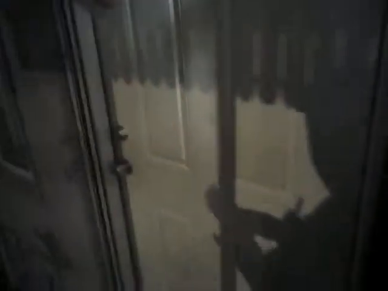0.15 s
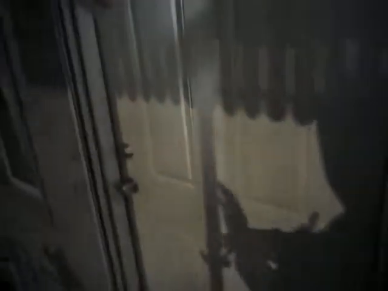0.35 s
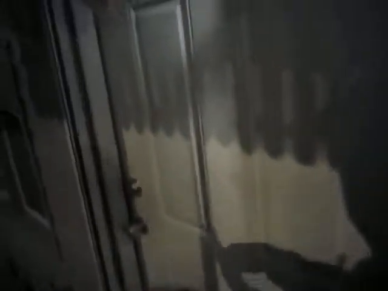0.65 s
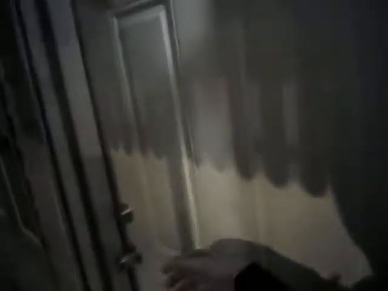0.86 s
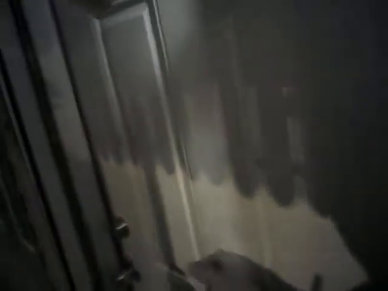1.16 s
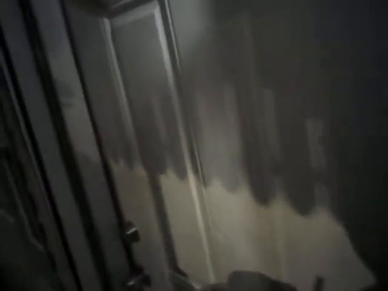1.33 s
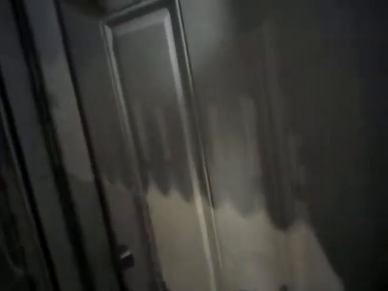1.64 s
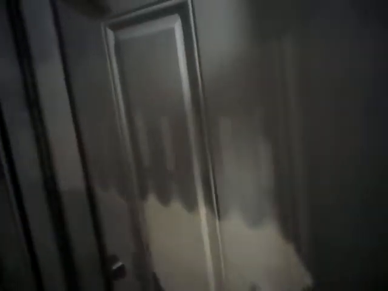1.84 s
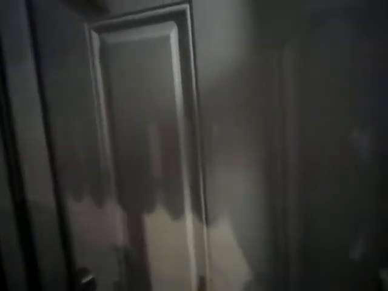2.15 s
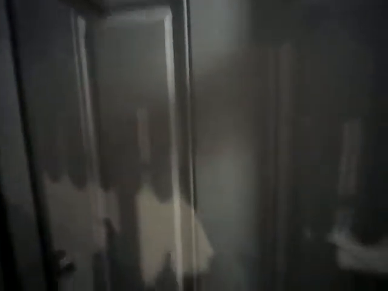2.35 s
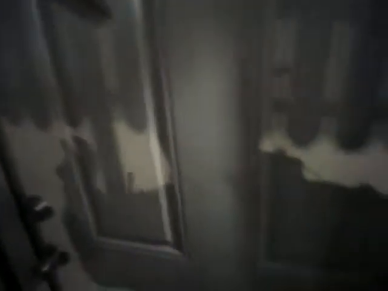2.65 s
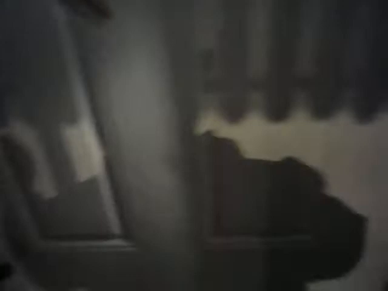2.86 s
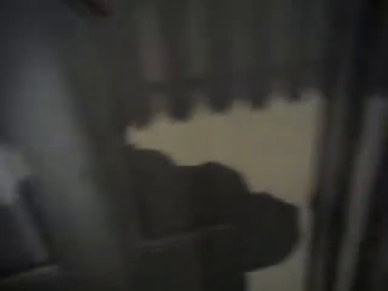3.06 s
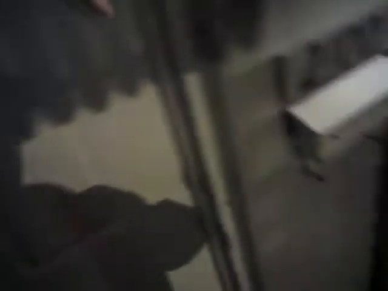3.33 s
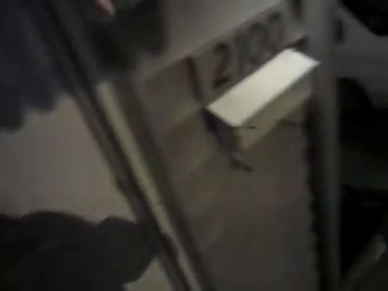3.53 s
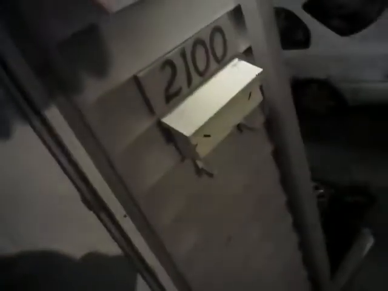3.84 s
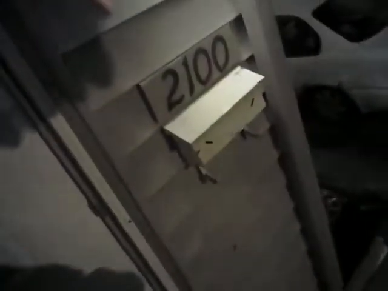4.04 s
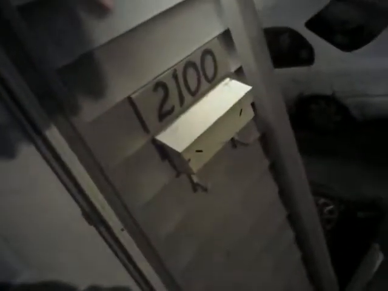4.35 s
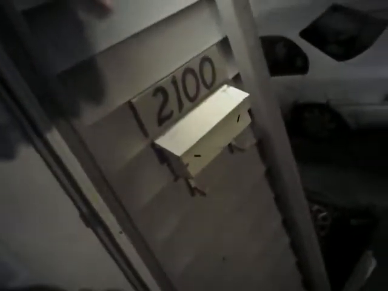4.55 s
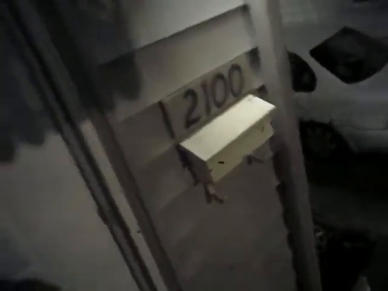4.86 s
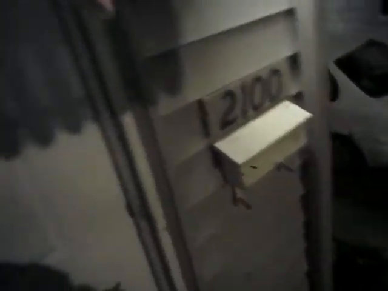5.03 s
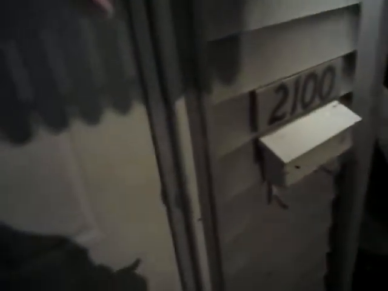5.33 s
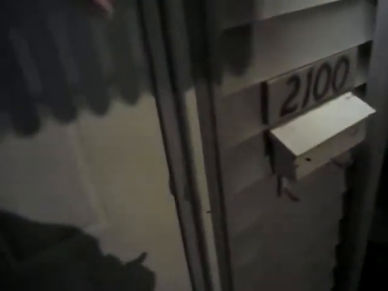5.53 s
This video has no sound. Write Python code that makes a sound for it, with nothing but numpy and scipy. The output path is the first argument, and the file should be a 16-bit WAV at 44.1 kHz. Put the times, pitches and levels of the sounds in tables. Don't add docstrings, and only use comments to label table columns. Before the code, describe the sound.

A storm door closer hisses and creaks, six uneven hard knuckle knocks land on a panelled door, then faint gear ticks over distant traffic.

```python
import sys
import numpy as np
from scipy import signal
from scipy.io import wavfile
from scipy.ndimage import uniform_filter1d

SR = 44100
rng = np.random.default_rng(int(sys.argv[2]) if len(sys.argv) > 2 else 0)


def int16_out(signal):
    q = np.round(np.clip(np.atleast_2d(signal).T, -1, 1) * 32767)
    wavfile.write(sys.argv[1], SR, q.astype(np.int16))


def boost(x):
    u = np.asarray(x, float) / 20
    return 10 ** u


N = 250929

# pitch_hz, level_db, t60_s
CLOSER_MODES = [(577, -17.5, 0.017), (1047, -10, 0.02), (1106, -8.5, 0.024), (1255, -7.5, 0.017),
                (1407, 2.5, 0.013), (1570, -2, 0.015), (1690, -2.5, 0.032), (1812, -5, 0.027),
                (1932, -11.5, 0.031), (2106, -11.5, 0.017), (2328, -5.5, 0.017)]
# pitch_hz, level_db, t60_s
STIFF_MODES = [(2680, -6, 0.021), (2640, -7.5, 0.005), (2704, 3, 0.004), (3400, 0, 0.015), (3128, 9, 0.017),
               (3750, -9.5, 0.045), (3940, -9, 0.0048)]


def evened(x):
    return x / np.sqrt(np.mean(x ** 2) + 1e-20)


def peaked(x):
    return x / np.max(abs(x))


def read(points, hz):
    f, value = np.transpose(points)
    return np.interp(np.log(hz + 1), np.log(f + 1), value)


def add(mix, start_s, sound):
    part = mix[round(start_s * SR):][:len(sound)]
    part += sound[:len(part)]


def ring(modes, rise_s, spot_db, detune, size=9000, count=3, sustain=1, signs=None):
    t = np.arange(size) / SR
    hz, db, t60 = np.transpose(count * list(modes))[:, :, None]
    spot, tune, side = rng.standard_normal((3, len(hz), 1))
    if signs is not None:
        side = np.reshape(signs, side.shape)
    sines = np.sign(side) * np.sin(2 * np.pi * hz * (1 + detune * tune) * t)
    decay = boost(db + spot_db * spot - 60 * t / (t60 * sustain))
    onset = 1 - np.exp(-t / rise_s)
    return peaked((decay * sines).sum(0) * onset)


def street():
    # frequency_hz, level_db
    colour = [(15, -44), (25, -11.5), (85, -7.5), (370, -10), (720, -14), (1500, 1), (3040, -6.5),
              (3400, -13.5)]
    # time_s, hiss_db
    traffic = [(0, -56.5), (1.198, -52), (2.2, -53), (2.949, -54.5), (3.3, -53), (4.002, -55.5),
               (5.099, -58), (5.69, -58)]
    rumble_mean_db, rumble_follows = -62, .15
    frames, hz = N // 256 + 5, np.fft.rfftfreq(1024, 1 / SR)
    real, imaginary, patches = rng.standard_normal((frames, 513, 3)).T
    patches = uniform_filter1d(patches, 12, 0)
    patches = evened(uniform_filter1d(patches, 8, 1))
    flicker = evened(uniform_filter1d(rng.standard_normal(frames), 3))
    level_db = read(colour, hz)[:, None] + 1.9 * patches + 1.1 * flicker
    spectrum = (real + 1j * imaginary) * boost(level_db) * (hz[:, None] < 5000)
    high = np.clip((hz[:, None] - 700) / 300, 0, 1)
    split = spectrum * np.sqrt([high, 1 - high])
    hiss, rumble = signal.istft(split, nperseg=1024, noverlap=768)[1][:, :N]
    hiss_db = np.interp(np.arange(N) / SR, *np.transpose(traffic))
    rumble_db = rumble_mean_db + rumble_follows * (hiss_db - hiss_db.mean())
    return evened(hiss) * boost(hiss_db) + evened(rumble) * boost(rumble_db)


def gear():
    # start_s, peak_db, pitch_hz, brightness_db
    ticks = [(.0044, -39, 1770, -21.5), (3.2994, -42, 2160, -9), (3.5194, -56, 1750, -4),
             (3.674, -42.5, 1860, -13), (3.9844, -38.5, 1790, -25), (4.14, -38.5, 1710, -30.5),
             (4.354, -44, 1780, -25), (4.374, -44, 1810, -23), (4.3919, -36, 1630, 7),
             (4.6037, -47, 2480, -18.5), (4.6532, -29.5, 2275, -3), (4.734, -59, 2280, -14),
             (4.9148, -47.5, 1720, -3), (5.1136, -61, 1850, -8), (5.2144, -54, 1900, 2.5),
             (5.6144, -41, 1570, -13.5)]
    # share of the pitch, level_db, t60_s
    shell = [(.3, -17, 0.0093), (.48, -15, 0.016), (.67, 1, 0.01), (.85, -9, 0.018),
             (1, -8, 0.022), (1.2, -3, 0.0075), (1.45, -14, 0.0082)]
    out = np.zeros(N)
    for start_s, peak_db, pitch_hz, bright_db in ticks:
        modes = [(share * pitch_hz, *rest) for share, *rest in shell]
        top = boost(bright_db - 0.5) * ring(STIFF_MODES, 0.00015, 0.3, 0.0049, size=2000)
        body = ring(modes, 0.0011, 0.37, 0.017, size=2000)
        add(out, start_s, boost(peak_db + 2.74) * (body + top))
    return out


def porch(x, echo_db, tail_db):
    # delay_s, level_db
    echoes = [(.0045, -13), (.009, -7), (.0135, -14), (.018, -12), (.027, -16)]
    # frequency_hz, t60_s
    decay_times = [(100, 0.034), (400, 0.26), (1000, 0.12), (2000, 0.11), (4000, 0.084)]
    taps = np.zeros(SR // 2)
    at = np.arange(120, SR // 2 - 20, 20)
    taps[at + rng.integers(0, 20, len(at))] = rng.choice([-1., 1.], len(at))
    hz, t, z = signal.stft(taps, SR, nperseg=256)
    decay = boost(-60 * t / read(decay_times, hz)[:, None])
    tail = signal.istft(z * decay, SR, nperseg=256)[1]
    tail *= boost(tail_db) / np.linalg.norm(tail)
    tail[0] += 1
    for delay_s, db in echoes:
        tail[round(delay_s * SR)] += boost(db + echo_db)
    return signal.fftconvolve(x, tail)[:N]


def slip(tube, bright_db):
    drag_s, drag_db = 0.016, 9
    frame = boost(-2) * ring(CLOSER_MODES, 0.0021, 1.9, .03, size=3000)
    top = boost(bright_db + 6.5) * ring(STIFF_MODES, .0003, 0.81, 0.034, size=3000)
    release = peaked(tube + frame) + top
    t = np.arange(2000) / SR
    chatter = rng.standard_normal(2000) ** 3 * np.exp(-(t / drag_s) ** 4)
    chatter *= boost(min(bright_db + drag_db, 3)) / np.linalg.norm(chatter)
    chatter[0] = 1
    return peaked(signal.fftconvolve(chatter, release))


def closer():
    # start_s, peak_db
    slips = [(0.7134, -39.5), (0.7368, -32.5), (0.777, -30.5), (0.8093, -29), (0.8428, -28),
             (0.8736, -27.5), (0.9061, -26), (0.9429, -25.5), (0.9744, -26), (1.0061, -25), (1.0321, -26.5),
             (1.055, -27), (1.0754, -30), (1.0919, -32.5), (1.1161, -28.5), (1.1595, -21.5), (1.1958, -24),
             (1.2174, -31), (1.2391, -19.5), (1.2995, -28.5), (1.3503, -20.5), (1.3858, -22), (1.4154, -22),
             (1.5238, -21.5), (1.5559, -25), (1.6127, -22.5), (1.684, -22.5), (1.7804, -28.5), (1.833, -29),
             (2.0172, -31.5)]
    # time_s, brightness_db
    seal = [(.14, -15.5), (.43, -22.5), (.485, -6.5), (.55, -16.5), (.9, -15), (1.1, -28.5), (1.4, -19),
            (1.7, -17), (2.02, -14.5)]
    # pitch_hz, level_db, t60_s
    squeal_modes = [(1710, -3.5, 0.045), (2054, -3, 0.049)]
    start_s, swell_s, end_s, fade_s = 0.16, 0.24, .76, .02
    rub_db, first_db, growth_db, squeal_db = -47.5, -6, 2.5, -6.5
    slips_per_s = 260
    t = np.arange(N) / SR
    bright_db = np.interp(t, *np.transpose(seal))
    chance, sizes, kind = rng.random((3, N))
    train = (chance < slips_per_s / SR) * boost(-2.0 * np.log(sizes + .02))
    train += .06 * (2 * sizes - 1)
    low, top = np.zeros((2, N))
    for k in range(4):
        part = train * (np.floor(4 * kind) == k)
        low += signal.oaconvolve(part, ring(CLOSER_MODES, .0004, 1.5, .04, size=3000))[:N]
        top += signal.oaconvolve(part, ring(STIFF_MODES, 0.00055, 1.9, 0.038, size=3000))[:N]
    squeal_ring = ring(squeal_modes, 0.0012, 0, 0, size=3000, count=1)
    squeal = evened(signal.oaconvolve(train, squeal_ring)[:N])
    swell = np.clip((t - start_s) / swell_s, 0, 1)
    level_db = rub_db + first_db * (1 - swell) + growth_db * (t - start_s) / (end_s - start_s)
    stroke = (t > start_s) * np.clip((end_s - t) / fade_s, 0, 1)
    rub = evened(low) + boost(squeal_db) * squeal + evened(top) * boost(bright_db + 4.0)
    out = rub * boost(level_db) * stroke
    tube = ring(CLOSER_MODES, .0012, 0, 0, size=3000, count=1)
    for slip_s, peak_db in slips:
        add(out, slip_s, boost(peak_db + 0.3) * slip(tube, bright_db[round(slip_s * SR)]))
    return out


def bump():
    # centre_s, level_db, pitch_hz, length_s
    touch = (.406, -46, 86, .045)
    centre_s, level_db, pitch_hz, length_s = touch
    out = np.zeros(N)
    t = np.arange(0, length_s, 1 / SR)
    pulse = np.sin(2 * np.pi * pitch_hz * t) * np.hanning(len(t))
    add(out, centre_s - length_s / 2, boost(level_db) * pulse)
    return out


def knock(rap_db, panel_db, crack_db):
    # pitch_hz, level_db, t60_s
    burst_modes = [(1220, -12, .07), (1305, -5, .09), (1425, -8, .08), (1530, 0, .085), (1635, -6, .08),
                   (1690, -7, .08), (1790, -12, .07), (1925, -14, .07), (2030, -15, .07), (2130, -15, .07)]
    # pitch_hz, level_db, t60_s
    panel_modes = [(257.3, -7, 0.22), (299.6, -12, 0.15), (400, -4, 0.07), (442.2, -11.5, 0.19),
                   (501.5, -3.5, 0.13), (552, -3, 0.07), (632, -1, 0.08), (683.5, -10, 0.15),
                   (751, 1, 0.07), (810, 2.5, 0.074), (834.3, 1, 0.089), (940, -17.5, 0.047),
                   (1103, -7.5, 0.14), (1165, -2.5, 0.11)]
    # pitch_hz, level_db, t60_s
    hardware_modes = [(2100, 4, 0.099), (2367, 15.5, 0.037), (2686, 14, 0.16), (2585, -18.5, 0.064),
                      (2964, -1, 0.13), (2903, -11.5, 0.18), (3050, -15, 0.055), (3184, 2.5, 0.19),
                      (3360, -2.5, 0.051), (3345, 5.5, 0.17), (3600, -7.5, 0.17), (4164, -14, 0.029)]
    rap_hz, burst_s = 1551.4, 0.00711
    t = np.arange(9000) / SR
    burst_envelope = np.clip(t / 0.0047, 0, 1) ** 0.51 * np.clip((burst_s - t) / 0.0026, 0, 1)
    burst_tone = np.sin(2 * np.pi * rap_hz * t) * burst_envelope
    burst = burst_tone + boost(-6) * ring(burst_modes, 0.0084, 1.5, .02, count=4)
    panel = ring(panel_modes, .004, 1.5, .003, count=1)
    grain = boost(2.5) * ring(panel_modes, 0.0022, 1.7, 0.091, count=10, sustain=0.83)
    crack = boost(crack_db + 3) * ring(hardware_modes, 0.005, 0.91, .08, count=8, sustain=0.64)
    return boost(rap_db - 1.23) * peaked(burst) + boost(panel_db + 4.5) * peaked(panel + grain) + crack


def door():
    # start_s, rap_db (peak), thud_db, panel_db, crack_db
    knocks = [
        (1.2439, -23, -26, -25.5, -36),
        (1.4488, -10.5, -26, -19.5, -32),
        (1.717, -4, -24.5, -15.5, -31),
        (1.8837, -7.5, -25, -21, -32.5),
        (2.1873, -11.5, -32.5, -20.5, -39.5),
        (2.485, -0.5, -26, -15, -24),
    ]
    # pitch_hz, level_db, t60_s
    frame_modes = [(97.1, 0.5, 0.04), (119.1, -23, .36), (101.8, -34.5, 0.71), (82.5, -2.5, 0.077),
                   (136, -9, 0.033), (174.8, -18.5, 0.12), (207.6, -23.5, .14)]
    frame_signs = [1, 1, -1, -1, -1, 1, -1]
    lead_s = 0.00024
    out = np.zeros(N)
    thud = ring(frame_modes, 0.0027, 0, 0, size=16000, count=1, signs=frame_signs)
    for start_s, rap_db, thud_db, panel_db, crack_db in knocks:
        add(out, start_s - lead_s, boost(thud_db + 4.0) * thud)
        add(out, start_s, knock(rap_db, panel_db, crack_db))
    return out


def scene():
    creak = porch(closer(), -12.5, -6)
    knocking = porch(door(), -23.5, -6)
    ticking = porch(gear(), -28, -4)
    return (knocking + creak + ticking + bump() + street())[None]


def mute_bands(x):
    # from_hz, to_hz, muted share of the time
    muted_bands = [(3440, 3610, .45), (3610, 3960, .12), (3960, 4170, .7), (4170, 4370, .35),
                   (4370, 4600, .9)]
    hz, t, z = signal.stft(x, SR, nperseg=1024)
    for low_hz, high_hz, share in muted_bands:
        band = (hz >= low_hz) & (hz < high_hz)
        power = (abs(z[:, band]) ** 2).mean(1)
        power = np.log(uniform_filter1d(power, size=3) + 1e-20)
        power = power - .7 * uniform_filter1d(power, size=40)
        z[:, band] *= (power > np.quantile(power, share))[:, None]
    return signal.istft(z, SR, nperseg=1024)[1][:, :N]


def band_limit(x):
    return signal.sosfilt(signal.butter(12, 16000, fs=SR, output="sos"), x)


def record(dry):
    low_pass = signal.butter(N=6, Wn=3500, fs=SR, output="sos")
    high_pass = signal.butter(N=2, Wn=55, btype="high", fs=SR, output="sos")
    narrow = signal.sosfilt(high_pass, signal.sosfilt(low_pass, dry))
    for null_hz, sharpness in [(3500, 9), (4030, 22)]:
        narrow = signal.lfilter(*signal.iirnotch(null_hz, sharpness, SR), narrow)
    edge = signal.firwin(401, 4380, window=("kaiser", 9), fs=SR)
    narrow = signal.oaconvolve(narrow, edge[None], "same")
    capped = np.clip(mute_bands(narrow), -.71, .76)
    return band_limit(capped)


dry = scene()
out = record(dry)
int16_out(out)
```